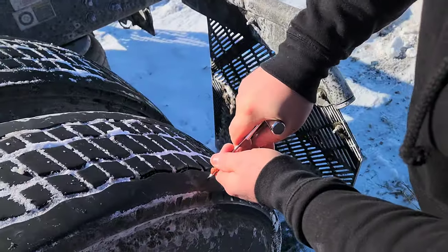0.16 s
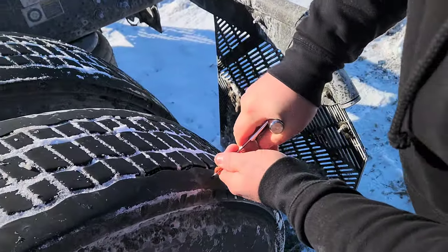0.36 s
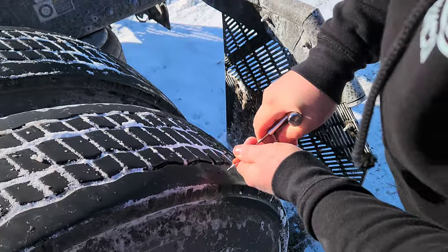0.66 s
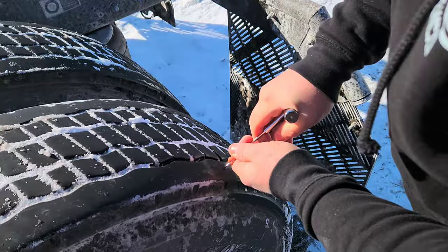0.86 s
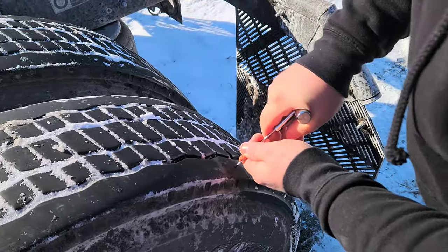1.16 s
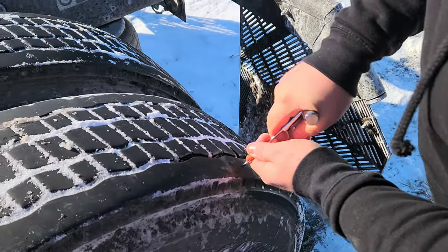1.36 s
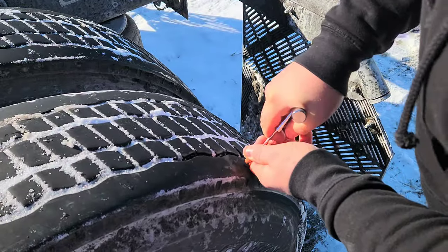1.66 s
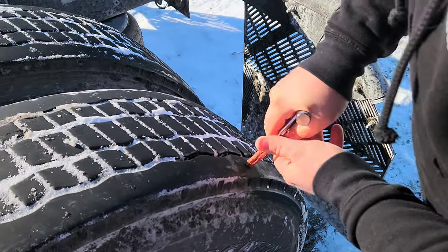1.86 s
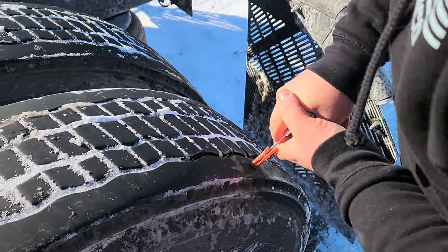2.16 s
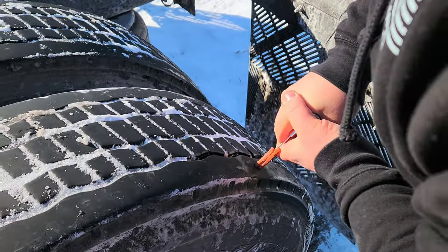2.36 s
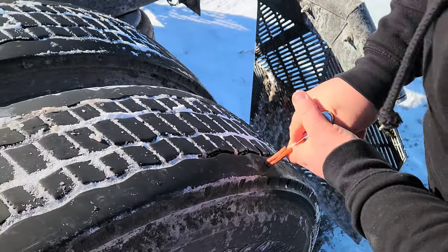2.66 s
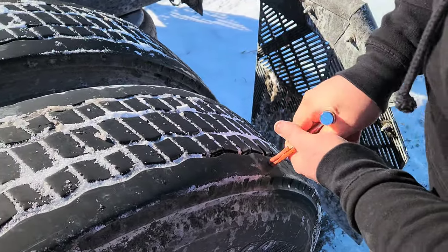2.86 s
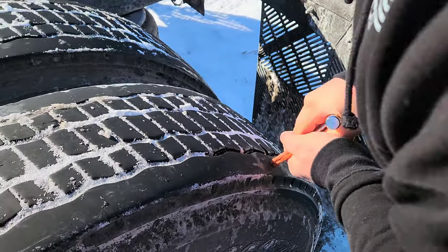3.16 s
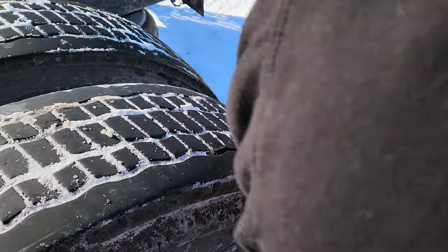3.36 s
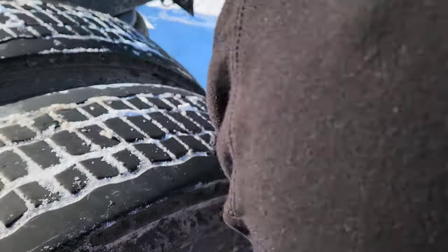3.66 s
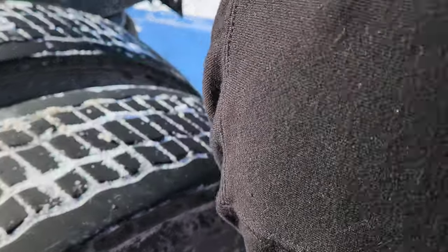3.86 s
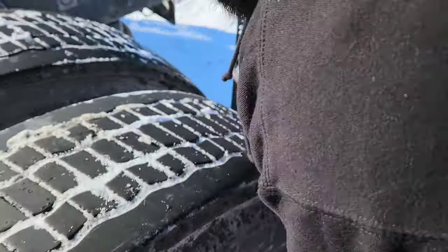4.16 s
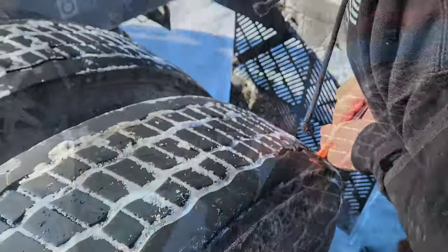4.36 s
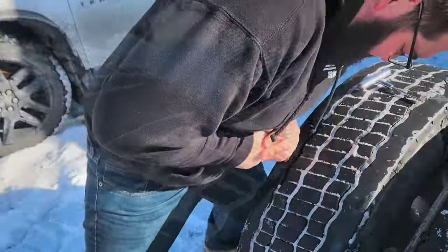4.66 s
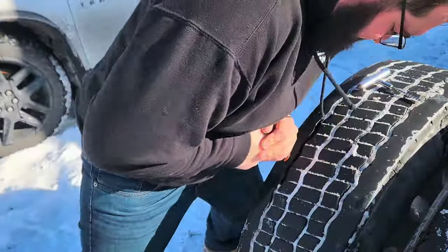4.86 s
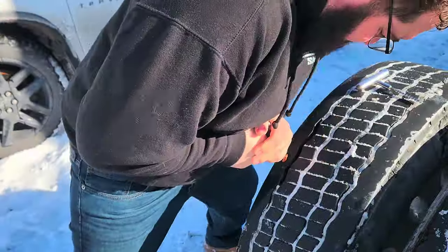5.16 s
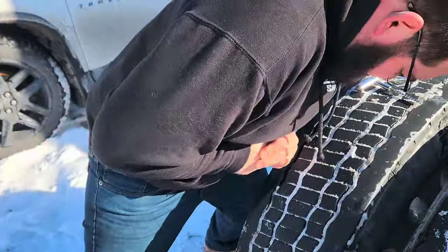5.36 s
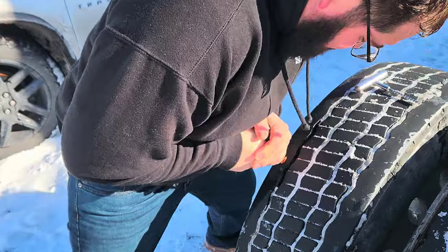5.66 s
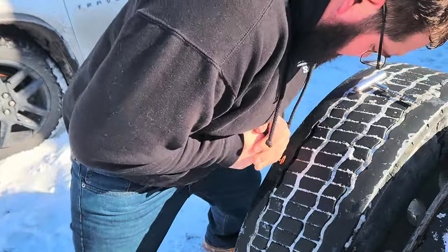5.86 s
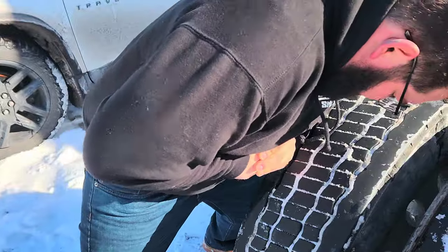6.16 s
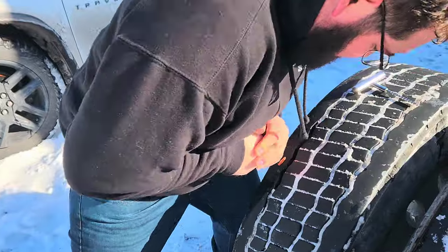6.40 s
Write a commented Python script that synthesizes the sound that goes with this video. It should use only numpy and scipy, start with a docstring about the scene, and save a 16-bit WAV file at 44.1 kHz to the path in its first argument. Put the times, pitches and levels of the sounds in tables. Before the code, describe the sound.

Wind buffets the microphone in an open yard while a close, fluttering hiss of air escapes from a truck tire, slightly to the left. The hiss swells, chokes and spurts as a tool pushes a plug in, with one sharp tick along the way. It fades in stages and stops about five seconds in. Faint seeping, sleeve scuffs and soft knocks on the rubber follow under lighter wind.

```python
"""In an open yard, air escapes from a punctured truck tire while a hand tool works a plug into the hole.
The jet gushes when the hole gapes, thins to a sizzle when it is pinched, and dies to a seep as the plug
seals. Wind buffets the microphone. Hands, tool and rubber give ticks, soft knocks, scuffs and a creak."""
import sys
import numpy as np
from scipy import signal
from scipy.fft import rfft, irfft, next_fast_len
from scipy.io import wavfile
from scipy.ndimage import uniform_filter1d, map_coordinates

SR = 44100
rng = np.random.default_rng(int(sys.argv[2]) if len(sys.argv) > 2 else 0)


def wrap_up_sound(samples):
    """Save the sound to the file named by the first command line argument, as 16-bit audio."""
    columns = np.atleast_2d(samples).T
    # keep every value between -1 and 1, then stretch to whole-number steps
    tamed = np.clip(columns, -1, 1)
    steps = np.round(tamed * 32767).astype(np.int16)
    wavfile.write(sys.argv[1], SR, steps)


N = 288052
TIME = np.arange(N) / SR
TOP_HZ = 15900  # the highest treble that is kept
# how alike left and right sound, wind aside (frequency [Hz], likeness [0 to 1])
LIKENESS = [(300, 0.89), (900, 0.94), (2000, 0.51), (2800, 0.45), (4400, 0.64), (5500, 0.38), (8000, .2),
            (15000, .15)]


def amp(db):
    """Turn decibels into a gain."""
    return 10 ** (np.asarray(db) / 20)


def unit(x):
    """Scale x to an average strength (rms) of 1."""
    return x / np.sqrt(np.mean(x ** 2) + 1e-20)


def along(points, hz):
    """Read between (frequency, value) points, with octaves evenly spaced."""
    freqs, values = np.transpose(points)
    return np.interp(np.log(hz + 1), np.log(freqs + 1), values)


def curves(rows):
    """Give one value per sample for each column after the time."""
    times, *columns = np.transpose(rows)
    return [np.interp(TIME, times, column) for column in columns]


def wobble(rate):
    """A smooth random curve through `rate` points a second."""
    return map_coordinates(rng.standard_normal(int(N * rate / SR) + 4), [TIME * rate])


def filtered(x, response):
    """Scale each frequency in x by response(hz)."""
    size = next_fast_len(N + 8192)
    return irfft(rfft(x, size) * response(np.fft.rfftfreq(size, 1 / SR)), size)[..., :N]


def noise(colour, alike=LIKENESS):
    """Stereo noise whose colour lists how strong each frequency is."""
    def response(hz):
        spread = np.arccos(np.clip(along(alike, hz), -1, 1)) / 2
        return amp(along(colour, hz)) * np.array([np.cos(spread), np.sin(spread)])
    mid, side = filtered(rng.standard_normal((2, N)), response)
    return np.array([mid + side, mid - side]) / np.std(mid)


def band(x, hz, width_hz):
    """Pass x through one soft resonance and scale it to strength 1."""
    edges = np.clip([hz - width_hz / 2, hz + width_hz / 2], 50, SR / 2 - 50)
    return unit(signal.sosfilt(signal.butter(2, edges, "bandpass", fs=SR, output="sos"), x))


def panned(x, left_db):
    """Make the left side left_db louder than the right, at the same total power."""
    gains = amp(np.array([left_db, -left_db]).reshape(2, -1) / 2)
    return x * gains / np.sqrt(np.mean(gains ** 2, axis=0))


def leak():
    """A churning jet of air: the narrower the gap beside the plug, the higher it hisses."""
    # air flowing past the plug (time [s], level [dB])
    flow = [(0, -24), (.15, -22.5), (.37, -25), (.72, -29), (1, -24.5), (1.33, -20.5), (1.65, -26),
            (1.82, -34.5), (2.06, -34), (2.27, -35.5), (2.42, -41.5), (2.78, -30), (3.22, -34.5),
            (3.52, -46), (3.7, -41), (3.85, -39.5), (4.18, -45), (4.34, -33.5), (4.48, -35.5),
            (4.76, -51.5), (4.88, -51.5), (5.02, -58)]
    # gush where the jet hits hands and tool (time [s], level above the flow [dB])
    spill = [(0, -9.5), (.13, -16.5), (.36, -4), (.72, -11), (1.35, -10.5), (1.68, -14.5), (1.82, -7.5),
             (1.91, -15), (2.05, -8.5), (2.26, -17), (2.4, -3.5), (2.65, -10.5), (3.02, 0.5), (3.42, 6.5),
             (3.68, -3), (3.92, 1.5), (4.05, -4.5), (4.2, 0.5), (4.4, -9), (4.56, 0), (4.65, -4.5),
             (5.02, -2.5)]
    # how narrow the slit is (time [s], extra sizzle [dB])
    pinch = [(0, -0.5), (.5, 0), (.75, 3), (1.3, -4.5), (1.6, 2), (2.3, 6), (2.8, 7), (3.65, 2.5),
             (4.35, 4.5), (5.02, 0)]
    # the jet's lean to the left; each layer takes a share (time [s], left minus right [dB])
    shade = [(0, 5.5), (.75, 11.5), (1.3, 7.5), (2.45, 15), (2.92, 7), (3.3, 17), (4.15, 16.5), (4.43, 7),
             (4.61, 11), (5, 10)]
    # how much sooner the low layers reach the left side (time [s], lead [ms])
    lead = [(0, 0.041), (2.3, 0.028), (3.0, 0.053), (3.8, 0.069), (4.3, -0.021)]
    # the jet's four layers, low to high (frequency [Hz], level [dB])
    gush_colour = [(250, -22), (480, -8), (660, -3), (820, -1), (940, 0), (1150, -4.5), (1450, 0.5),
                   (2100, -1.5), (2700, -6.5), (3600, -13), (6000, -65)]
    spray_colour = [(1200, -28), (2300, -13.5), (2800, -6), (3300, -3), (4050, -1.5), (4500, -0.5),
                    (5050, -3), (5550, 0), (6100, -5), (7000, -9.5), (10000, -49)]
    hiss_colour = [(3500, -29), (5600, -20), (6250, -2.5), (6750, -2.5), (7450, 2.5), (8300, -1.5),
                   (9100, -4.5), (10100, -18), (11000, -9.5), (13000, -28.5), (16000, -44.5)]
    sizzle_colour = [(7000, -39.5), (9500, -7.5), (10900, -8.5), (11900, -3.5), (12750, 0), (13700, -4),
                     (14500, -2.5), (15100, 2.5), (15700, -8), (16200, -12.5)]
    sealed_s, closing_s = 5.09, 0.049  # when the plug seals, and how long that takes
    flow_db, spill_db, pinch_db, shade_db, lead_ms = (
        curves(table)[0] for table in (flow, spill, pinch, shade, lead))
    choke_db, spurt_db = pushes()
    jet_db = flow_db - choke_db
    # the gap flutters, and its wide part most of all
    flutter_db = .5 * wobble(40) + 0.38 * wobble(170)
    sputter_db = .6 * wobble(60)
    # a spurt comes through a wide gap, so it lifts the low layers most
    gush = amp(jet_db + spill_db + spurt_db + sputter_db) * noise(gush_colour)
    spray = amp(jet_db + 0.9 + 0.3 * spill_db + 0.78 * spurt_db + sputter_db) * noise(spray_colour)
    hiss = amp(jet_db + 0.42 + 0.63 * spurt_db) * noise(hiss_colour)
    sizzle = amp(jet_db + 1.5 + pinch_db) * noise(sizzle_colour)
    # high sounds are blocked from the right side most
    low = panned(gush, .87 * (shade_db - 9.0)) + panned(spray, 0.53 * shade_db)
    high = panned(hiss, 0.91 * shade_db) + panned(sizzle, 0.95 * shade_db) + swelling_bands(shade_db)
    low[1] = map_coordinates(low[1], [(TIME - lead_ms / 1000) * SR])
    open_gap = np.clip((sealed_s - TIME) / closing_s, 0, 1)
    jet = patchy(low + high, depth_db=1.3) * amp(flutter_db)
    return open_gap * reflected(jet, strength=0.12, delay_s=.0014, drift_s=.00008)


def swelling_bands(shade_db):
    """Brief bands of the jet's hiss swell and fade: hollow tones, a thin whistle, bright sizzle."""
    # each band (start [s], end [s], centre [Hz], width [Hz], level [dB])
    bands = [(0, .42, 2130, 1000, -31.5), (1.118, 1.38, 3760, 1500, -27), (1.55, 1.778, 12750, 700, -23.5),
             (2.53, 2.88, 4800, 1300, -41.5), (2.84, 3.24, 810, 460, -33.5), (3.683, 4.29, 835, 300, -46),
             (3.978, 4.15, 5600, 1200, -39), (4.21, 4.546, 2200, 800, -38.5),
             (4.25, 4.683, 14800, 2500, -30), (4.762, 5.002, 14800, 2500, -42)]
    out = np.zeros((2, N))
    stream = noise([(TOP_HZ, 0)])  # equally strong at all frequencies
    for start, end, hz, width_hz, db in bands:
        span = (TIME >= start) & (TIME < end)
        swell = np.sin(np.pi * (TIME[span] - start) / (end - start))
        hiss = amp(db) * swell * band(stream[:, span], hz, width_hz)
        out[:, span] += panned(hiss, shade_db[span] * min(1, hz / 6000))
    return out


def patchy(x, depth_db):
    """The slit's edges keep changing shape, so patches of the hiss briefly rise and dip."""
    spectra = signal.stft(x, nperseg=512)[2]
    patches = rng.standard_normal(spectra.shape[1:])
    patches = uniform_filter1d(patches, size=4, axis=0)  # smooth across frequency
    patches = uniform_filter1d(patches, size=16, axis=1)  # and across time
    return signal.istft(spectra * amp(depth_db * unit(patches)), nperseg=512)[1][:, :N]


def reflected(x, strength, delay_s, drift_s, count=4):
    """Tread, hands and sleeves send back weak echoes whose paths drift, so the tone ripples."""
    out = x.copy()
    for k in range(count):
        echo_time = TIME - delay_s * (k + rng.uniform(0.501, 1.5)) - drift_s * wobble(1.51)
        out += strength * np.array([np.interp(echo_time, TIME, side) for side in x])
    return out / np.sqrt(1 + count * strength ** 2)


def wind():
    """Big swirls of air push on both sides of the microphone together, small ones on each alone."""
    # wind strength (time [s], rumble [dB], swirls relative to the rumble [dB])
    strength = [(0, -23, -11), (.1, -25, -11), (.39, -34.5, -5.5), (.53, -27, -15), (.7, -34, -7),
                (.86, -23.5, -18), (1.22, -26.5, -12), (1.7, -28.5, -20.5), (2.42, -27.5, -10),
                (2.58, -37, -3.5), (2.95, -29.5, -3.5), (3.15, -33, -6.5), (3.68, -31, -9),
                (3.85, -37, -8.5), (4.5, -32.5, -9.5), (4.8, -39, -7), (5.15, -39.5, -9.5),
                (5.38, -43.5, -9), (5.9, -41.5, -10), (6.05, -38.5, -7.5), (6.53, -32.5, -13.5)]
    # the side that is hit harder (time [s], left minus right [dB])
    lean = [(0, 1), (2.3, -6), (3.2, -3), (5.2, -1)]
    # sudden gusts (time [s], peak [dB], width [s], swirls relative to the peak [dB])
    gusts = [(0.246, -20.5, 0.011, -24), (0.492, -17.5, 0.013, -34), (0.614, -25.5, 0.016, -2.5),
             (0.824, -22, 0.035, -9.5), (1.128, -25, 0.0098, -13.5), (1.463, -18.5, 0.029, -18.5),
             (1.602, -13.5, 0.011, -31), (1.844, -13.5, 0.012, -21.5), (2.114, -13.5, 0.0095, -36),
             (2.332, -12, 0.016, -17.5), (2.473, -18.5, 0.021, -22), (3.532, -20, .014, -13),
             (3.615, -24, 0.012, -7.5), (4.169, -20, 0.011, -27), (4.517, -21.5, 0.012, -12),
             (4.572, -18.5, 0.015, -16), (5.989, -28.5, 0.016, -11), (6.362, -17.5, 0.0071, -31)]
    # deep rumble and small swirls (frequency [Hz], level [dB])
    rumble_colour = [(12, -19), (25, -3.5), (42, -1.5), (66, 2.5), (85, -3.5), (120, -7.5), (170, -19),
                     (260, -38), (600, -76)]
    swirl_colour = [(70, -9.5), (115, 5), (170, 3), (270, -4), (380, -8.5), (520, -16.5), (900, -16.5),
                    (2500, -56)]
    # how alike left and right sound (frequency [Hz], likeness [0 to 1])
    alike = [(30, 0.86), (70, 1), (130, 0.52), (300, 0.22), (600, 0.36)]
    rumble_db, swirl_db = curves(strength)
    side_db, = curves(lean)
    rumble = noise(rumble_colour, alike)
    # even out chance swells, so the wind's strength sets the size of each push
    rumble /= np.sqrt(np.abs(uniform_filter1d(rumble.mean(0) ** 2, size=4000)) + 0.035)
    rumble *= amp(rumble_db + 1.9 * wobble(18))
    # a gust swings the pressure to and fro and sheds small swirls
    swells = np.array([amp(db) * np.exp(-.5 * ((TIME - s) / width) ** 2) for s, db, width, _ in gusts])
    shed = amp([db for *_, db in gusts]) @ swells
    swing_hz = 60 * np.exp(0.2018 * wobble(40))
    swing = 1.01 * np.sin(2 * np.pi * np.cumsum(swing_hz) / SR)
    swirl_gain = np.hypot(amp(rumble_db + swirl_db + 1.24), shed) * amp(2.95 * wobble(50))
    return panned(rumble + swells.sum(0) * swing + swirl_gain * noise(swirl_colour, alike), side_db)


def outdoors():
    """The faint, even wash of the open yard."""
    # background noise (frequency [Hz], level [dB])
    colour = [(40, 7), (200, -7.5), (500, -7.5), (1000, -14), (2100, -11.5), (2400, -20), (2900, -23),
              (3500, -19.5), (5000, -25), (5550, -20.5), (6500, -26), (8000, -28.5), (9500, -43),
              (16000, -47.5)]
    return amp(-53.5) * noise(colour)


def pushes(spurt_fade_s=0.044):
    """Each push of the tool chokes the hole, then frees a spurt as it lets go."""
    # each push (release [s], held before that [s], choke [dB], spurt [dB])
    shoves = [(.525, 0.14, 3, 8.5), (.606, .02, 0.5, 5.5), (0.839, .04, -1, 9), (1.13, 0.065, 2, 3),
              (1.57, 0.11, 7, -4), (2.55, 0.078, 2, 2), (3.009, 0.11, 2, 7), (3.764, 0.044, 6, 2.5),
              (5.045, .022, 9, 0)]
    choke_db = spurt_db = 0
    for s, held, choke, spurt in shoves:
        choke_db += choke * np.sqrt(np.clip(1 - (2 * (TIME - s) / held + 1) ** 2, 0, 1))
        spurt_db += spurt * (TIME > s) * np.exp(-np.abs(TIME - s) / spurt_fade_s)
    return choke_db, spurt_db


def ticks(fade_s=0.0084):
    """The tool catches in the hole and lets go with a tiny crack."""
    # each tick (time [s], level [dB])
    cracks = [(2.554, -22), (3.763, -35), (5.0186, -37), (5.0456, -37), (5.683, -45), (5.853, -43),
              (6.417, -47), (6.48, -46)]
    # a tick's tone (frequency [Hz], level [dB])
    colour = [(400, -12), (1500, -3), (6000, -1), (9000, -10), (16000, -2)]
    level = sum(amp(db - 60 * np.abs(TIME - s) / fade_s) * (TIME >= s) for s, db in cracks)
    return panned(level * noise(colour), left_db=3.3)


def knocks():
    """Tool and hands bump the tire; rubber and tool ring for only a moment."""
    # each bump (time [s], peak [dB])
    bumps = [(3.762, -26), (4.534, -30), (4.557, -35), (4.584, -31), (4.704, -37), (6.343, -38),
             (6.381, -35), (6.391, -35), (6.415, -29), (6.479, -31)]
    # the notes in a knock (typical pitch [Hz], level [dB], time to fade by 60 dB [s])
    notes = [(533, -2, 0.026), (784, 8, 0.02), (940, 0, 0.029), (1450, 0, 0.011), (1910, -9, .012)]
    out, t = np.zeros(N + SR), np.arange(SR // 8) / SR
    for s, db in bumps:
        ring = 0
        for hz, note_db, fade_s in notes:
            fade = amp(note_db + rng.normal(0, 0.92) - 60 * t / fade_s)
            ring += fade * np.sin(2 * np.pi * hz * rng.lognormal(0, 0.11) * t)
        click = 0.092 * amp(-60 * t / 0.0091) * rng.standard_normal(len(t))
        blow = (ring + click) * (1 - np.exp(-t / 0.001))  # softened start
        out[round(s * SR):][:len(t)] += amp(db) * blow / np.abs(blow).max()
    return panned(out[:N], left_db=2.3)


def scuffs():
    """Sleeves and hands drag over the icy tread in short strokes of many tiny catches."""
    # each stroke (middle [s], half-width [s], level [dB])
    strokes = [(4.545, .028, -38.5), (4.725, .035, -56), (5.693, 0.022, -51), (5.888, .025, -53),
               (6.3, 0.043, -53), (6.394, .022, -50), (6.49, 0.024, -47)]
    # rubbing cloth (frequency [Hz], level [dB])
    colour = [(200, -9.5), (550, -1.5), (900, -5), (1400, -7.5), (2000, -7), (2800, -17.5), (4000, -18),
              (8000, -25), (16000, -39.5)]
    level = sum(amp(db) / (1 + ((TIME - s) / width) ** 2) for s, width, db in strokes)
    catches = unit(amp(2.5 * wobble(220) + 2 * wobble(50)))
    return panned(level * catches * noise(colour), left_db=2.5)


def seep(sag_db_per_s=32.5, cutoff_db_per_s=258):
    """The last air squeezes through a thin slit: each spurt rises, sags and is pinched off."""
    # each spurt (start [s], rise [s], pinched off after [s], level [dB])
    spurts = [(5.042, 0.027, 0.23, -43.5), (5.628, 0.14, 0.4, -52)]
    # the whistly slit (frequency [Hz], level [dB])
    colour = [(2800, -20.5), (4100, -7.5), (5000, -13.5), (5650, -8), (6400, -17.5), (7750, -2),
              (8900, -12), (11200, -12.5), (12700, -2.5), (13900, -11), (14700, 3), (15400, -9),
              (16000, -8.5)]
    level = np.zeros(N)
    for start, rise, length, db in spurts:
        t = TIME - start
        fall_db = sag_db_per_s * np.maximum(t - rise, 0) + cutoff_db_per_s * np.maximum(t - length, 0)
        level += np.clip(t / rise, 0, 1) ** 2 * amp(db - fall_db)
    return panned(level * amp(1.1 * wobble(58)) * noise(colour), left_db=8.3)


def creak(peak_s=6.029, fade_s=0.013, hz=590, db=-39):
    """The plug slips in the rubber with one short, falling note."""
    t = TIME - peak_s
    pitch = hz * np.exp(-2.5 * np.clip(t, -.1, .1) + 0.055 * wobble(250))
    swell = np.exp(-.5 * (t / np.where(t < 0, .45 * fade_s, fade_s)) ** 2)
    return panned(amp(db) * swell * np.sin(2 * np.pi * np.cumsum(pitch) / SR), left_db=18)


def scene():
    """Leak, wind and handling in the open air."""
    return leak() + seep() + wind() + knocks() + ticks() + scuffs() + creak() + outdoors()


def record(dry):
    """Round off the highest peaks and cut the very top of the treble."""
    rounded = dry / (1 + np.abs(dry / .95) ** 8) ** (1 / 8)
    return filtered(rounded, lambda hz: np.clip((TOP_HZ + 100 - hz) / 250, 0, 1) ** 2)


dry = scene()
out = record(dry)
wrap_up_sound(out)
```